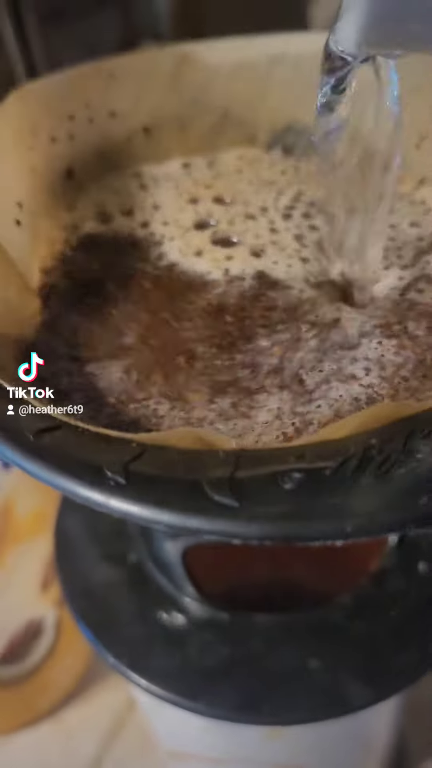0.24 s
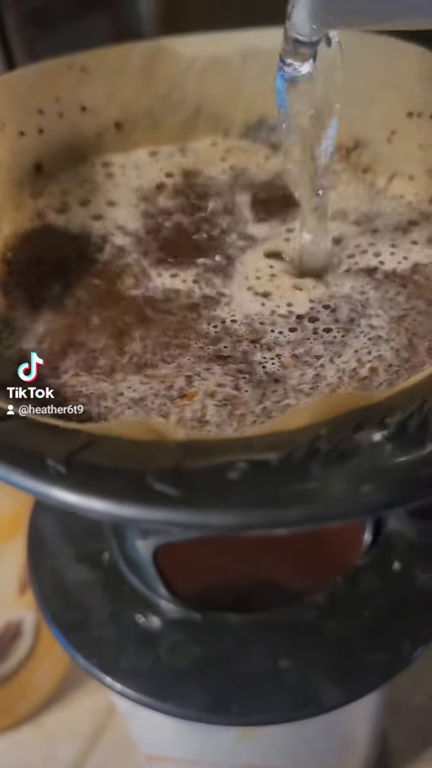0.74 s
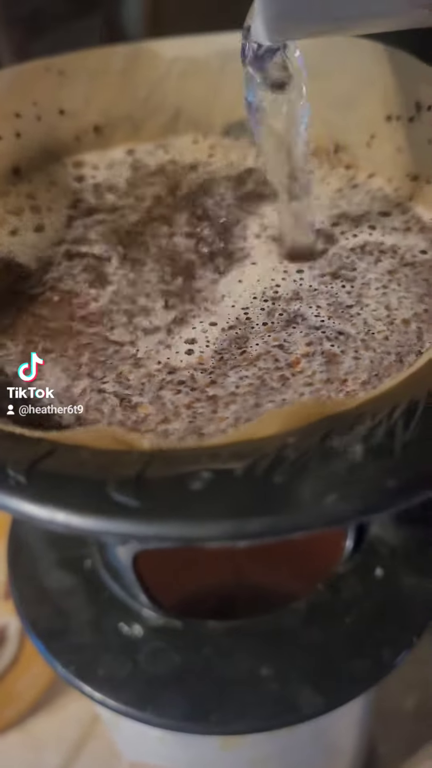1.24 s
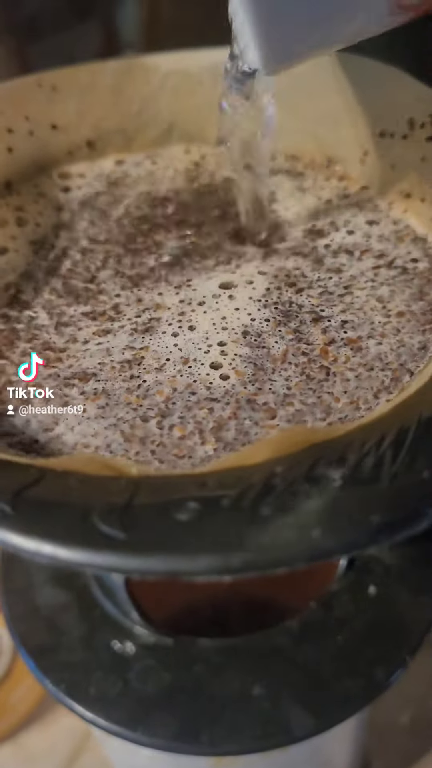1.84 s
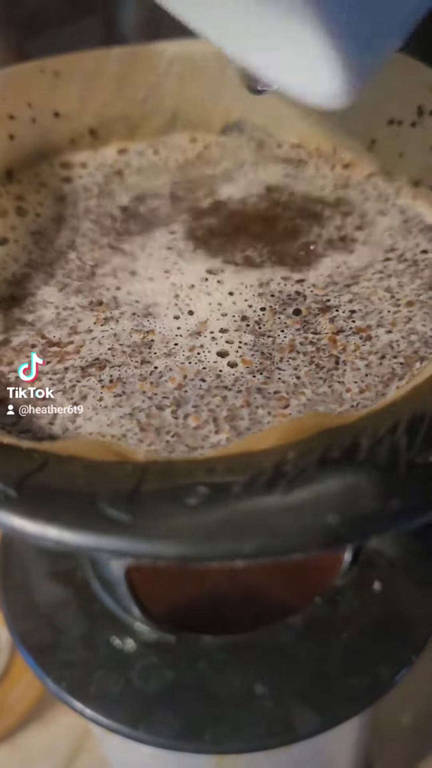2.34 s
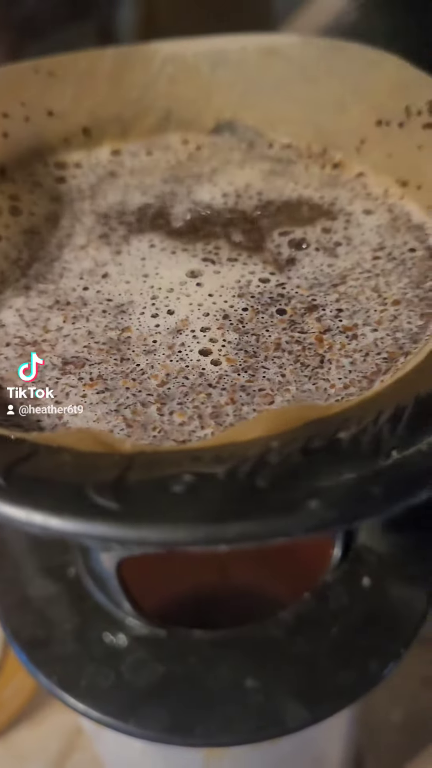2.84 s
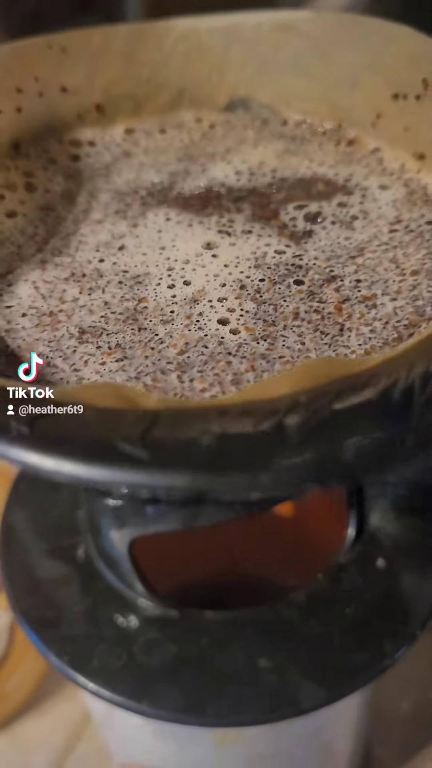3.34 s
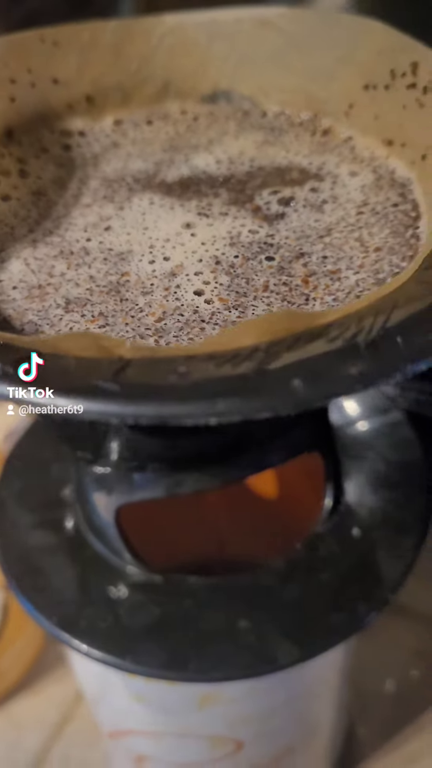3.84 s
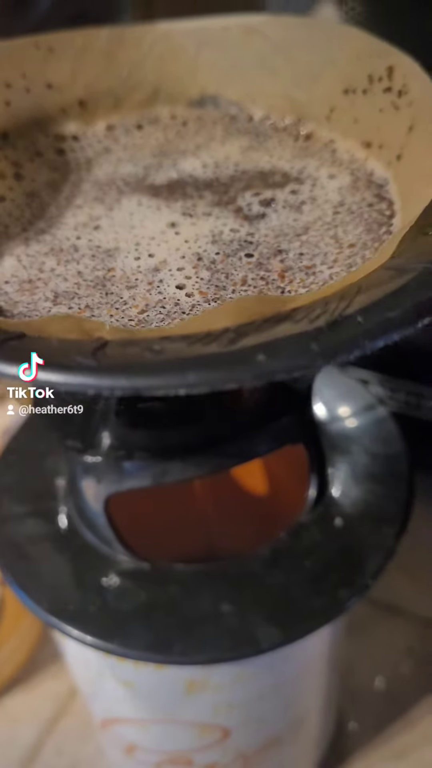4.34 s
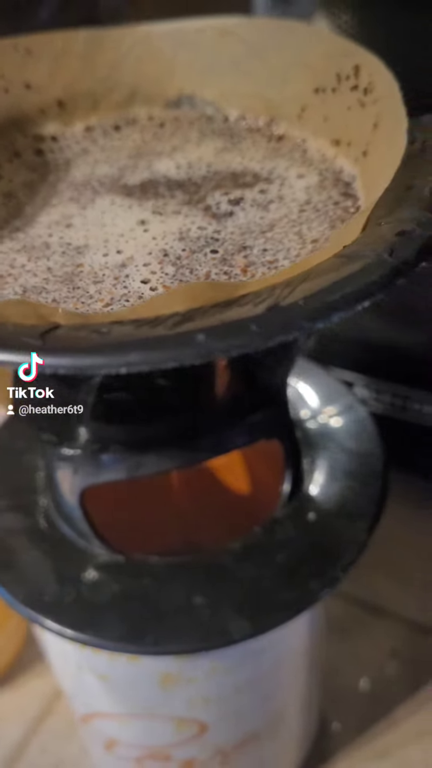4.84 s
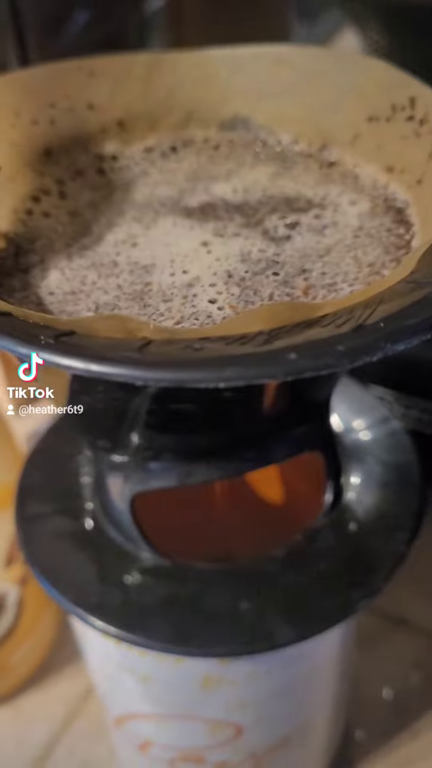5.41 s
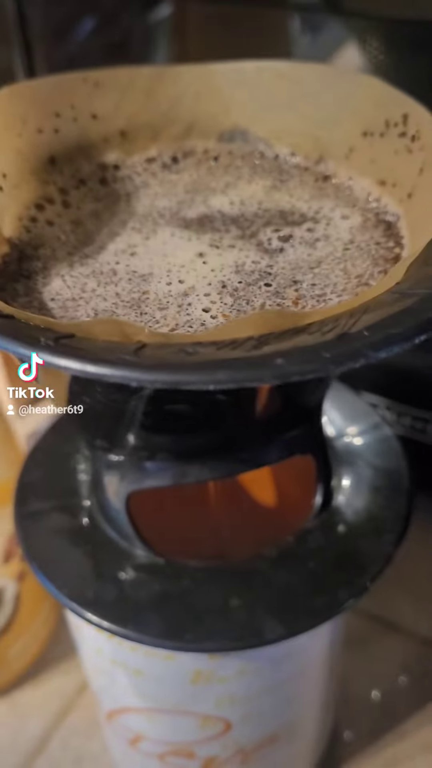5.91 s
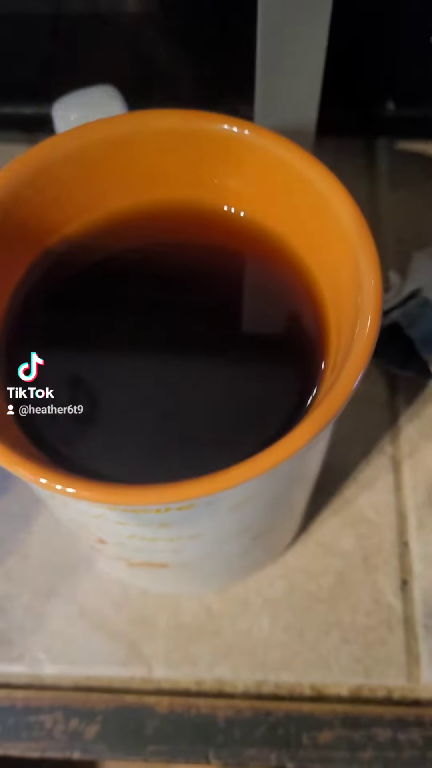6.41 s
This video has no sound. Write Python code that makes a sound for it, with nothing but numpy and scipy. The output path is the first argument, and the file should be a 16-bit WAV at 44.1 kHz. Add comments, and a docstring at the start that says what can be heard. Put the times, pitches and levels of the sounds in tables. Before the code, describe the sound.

Close up in a small quiet kitchen, a thin stream of coffee trickles and drips into a covered ceramic mug with hollow plops and bubbly blips. Water hisses softly onto crackling foam for two seconds, then stops. The dripping thins. Near four seconds a much louder wooden clunk rattles and bumps with a short room tail. After more drips, a tiny silence cuts to humming room tone, a faint swish and a light metallic jingle.

```python
"""Drops splash into a ceramic mug under a plastic filter cone while hot water is poured on the coffee.
Drops tick, slap and trap bubbles that ring the covered mug's air; foam on the grounds fizzes and crackles.
Something wooden, like a cupboard door, clunks and rattles: filtered noise, decaying modes and room tail.
After a short silence a second scene plays: humming room tone, a fading swish and a light metal jingle."""
import sys
import numpy as np
from scipy import signal
from scipy.fft import rfft, irfft
from scipy.io import wavfile
from scipy.ndimage import uniform_filter1d

SR = 44100
rng = np.random.default_rng(int(sys.argv[2]) if len(sys.argv) > 2 else 0)


def output_pcm(signal):
    """Save a mono or channel-first signal as 16-bit PCM at the path in sys.argv[1].

    Samples are clipped to [-1, 1] before scaling.
    """
    pcm = np.clip(np.atleast_2d(signal).T, -1, 1) * 32767
    wavfile.write(sys.argv[1], SR, np.round(pcm).astype(np.int16))


N = 294147
TIME = np.arange(N) / SR
BREW_END_S, SECOND_START_S, BAND_LIMIT_HZ = 6.246, 6.278, 15650

# Event and flow levels are relative: each source adds its own trim.
# background spectra: frequency_hz, density_db
HUSH_SPECTRUM = [(20, -6.5), (70, -8), (160, -11), (300, -14), (660, -13), (1100, -39.5), (2400, -31.5),
                 (4000, -40.5), (15000, -28.5)]
SECOND_HUSH_SPECTRUM = [(20, -10.5), (60, 5.5), (110, -9.5), (260, -4.5), (420, -11.5), (620, -2),
                        (1150, -26), (1900, -11.5), (2450, -34), (3100, -22.5), (3700, -23), (7000, -29),
                        (15000, -36)]
RUMBLE_SPECTRUM = [(20, -31), (42, -19.0), (52, -25.5), (64, 3.0), (90, -32.5), (200, -37.0), (1000, -54.0)]
# steady kitchen hum: frequency_hz, level_db
HUM_TONES = [(64.6, -77), (128, -78), (171.3, -68), (238, -78), (339.5, -77), (635.2, -76), (662, -80)]
# soft swish spectrum: frequency_hz, density_db
SWISH_SPECTRUM = [(300, -33), (600, -2), (1150, -15), (1900, -2.5), (2450, -17), (3150, -3), (3600, -29),
                  (8000, -26)]
SWISH_DB, SWISH_END_S, SWISH_FADE_S = -68, 6.58, 0.2
# kitchen reverberation: frequency_hz, t60_s
ROOM_DECAY = [(100, 0.18), (350, 0.43), (900, 0.2), (2000, 0.24), (5000, 0.23), (14000, 0.41)]
# kitchen colour on the door's room tail: frequency_hz, density_db
KITCHEN_SPECTRUM = [(40, -12), (90, -17.5), (135, -3.5), (190, -15), (290, -3), (550, -6.5), (800, -1),
                    (1400, -6.5), (2200, -4.5), (3200, -17.5), (6000, -22.5), (15000, -55)]

# small metal pieces touching: start_s, level_db
JINGLE_HITS = [(6.327, -50), (6.421, -17.5), (6.48, -38), (6.573, -24.5), (6.6123, -7), (6.619, -33),
               (6.629, -20), (6.654, -25), (6.658, -12.5)]
# modes of the metal pieces: frequency_hz, t60_s, level_db
METAL_MODES = [(5350, .2, -27), (6360, .2, -27), (9150, .11, -17), (10440, .14, -32), (12554, .13, 0),
               (14830, .14, -13), (15010, .15, -7)]
# contact noise of the metal pieces: frequency_hz, density_db
METAL_TICK_SPECTRUM = [(1000, -81), (2500, -66), (3500, -31), (6000, -11), (8500, -7.5), (12500, 3.5),
                       (15500, -2.5)]

# blows of the door: start_s, level_db, treble_corner_hz, room_share_db
DOOR_BLOWS = [(3.8730, 16, 2900, -4), (3.8786, 4, 2580, -8), (3.8850, -1, 2200, -7.5),
              (3.9241, 11.5, 2660, -5), (3.929, 3.5, 2400, 0), (4.026, -12, 2600, -13),
              (4.101, 3.5, 2110, -21), (4.1223, 9.5, 1900, -2.5), (4.1276, -4.5, 1490, 7),
              (4.167, 4.5, 1560, 3.5), (4.199, -0.5, 1290, 0.5), (4.232, -2.5, 790, 4.5),
              (4.271, -14, 600, 2.5), (4.31, -16.5, 1090, 5), (4.34, -14.5, 513, 9), (4.5180, 5, 556, -14),
              (4.5300, 2, 840, -2.5), (4.558, -11, 597, -3)]
# modes of the door panel: frequency_hz, t60_s, level_db
PANEL_MODES = [(130.6, 0.38, -15), (229, 0.4, -13), (276.4, 0.2, -7), (332, 0.15, -4.5), (377, .15, -13),
               (464, 0.33, -9), (527, 0.15, -16), (654, 0.26, -10.5), (738, 0.087, -1.5), (800, 0.16, -4.5),
               (964, 0.41, -14.5), (1070, 0.21, -16.5), (1172, 0.094, -12.5), (1325, .23, -16.5),
               (1540, .25, -23), (1245, 0.044, -2), (1635, 0.048, -6), (1730, 0.11, -5.5), (1770, 0.05, -5),
               (1905, .22, -9), (1857, 0.12, -7), (2190, 0.11, -2), (2340, .1, -10.5), (2622, 0.048, -8.5)]
# thin high metallic ring heard with each blow: frequency_hz, t60_s, level_db
THIN_RING_MODES = [(8000, .2, -9), (12554, .2, 0), (15011, .22, -9)]
# crack of the wood: frequency_hz, density_db
WOOD_SPECTRUM = [(40, -53), (90, -29.5), (190, -11.5), (300, -4), (800, 3), (1350, -6), (1900, -3),
                 (2500, -1), (3200, -12), (5000, -19.5), (8000, -27.5), (15000, -16)]
# door rubbing along: frequency_hz, density_db
RUB_SPECTRUM = [(60, -26.0), (170, -38.0), (330, 11.0), (700, 4.5), (1300, 0.0), (3000, -19.5)]
# strength of the rubbing: time_s, gain
RUB_GAIN = [(4.12, 0.029), (4.22, 0.38), (4.31, 0.19), (4.40, 1), (4.45, 0.037)]

# loudest foam bubbles bursting on the grounds: start_s, level_db
FOAM_POPS = [(0.1702, -41), (0.2017, -44), (0.2755, -41), (0.375, -34.5), (0.406, -40), (0.5521, -56),
             (0.567, -37.5), (0.732, -37), (0.7813, -37), (0.815, -36.5), (1.05, -38), (1.7842, -47),
             (1.8022, -39), (1.8192, -32.5), (1.919, -47), (2.008, -39.5), (2.069, -42), (2.0995, -34.5),
             (2.417, -41.5), (2.4637, -42), (2.5223, -42), (2.538, -44), (2.549, -61), (2.5715, -34.5),
             (2.8955, -41.5), (2.987, -41), (3.495, -35.5), (3.646, -41), (5.045, -39), (5.1076, -40),
             (5.1704, -39), (5.5346, -41), (6.034, -46), (6.072, -44.5)]
# foam heard through the paper cone: frequency_hz, density_db
FOAM_SPECTRUM = [(500, -42.5), (2500, 3.5), (4300, -4), (4900, -4.5), (5600, 1), (6600, -1), (7700, -0.5),
                 (8700, -2), (10500, 1.5), (15000, -3)]
# the fizz calms steadily and follows part of the stream's level
FIZZ_DB, SETTLE_DB_PER_S, FIZZ_FOLLOWS = -68.5, 1.46, 0.75

# hot water running into the foam
POUR_DB, POUR_END_S, POUR_FADE_S = -72.5, 2.21, 0.29
CHURN_DB = -3.5  # relative to the flow level
# strength of the thin stream from the cone: time_s, level_db
STREAM_FLOW = [(0.0, -56.5), (0.6, -51), (0.75, -56.5), (0.83, -46.5), (0.91, -58), (1.2, -55.5),
               (1.8, -57), (2.24, -56.5), (2.38, -61), (2.55, -61.5), (2.97, -53), (3.08, -70.5),
               (3.23, -53.5), (3.4, -65.5), (3.55, -57), (4.6, -54.5), (4.88, -63), (5.08, -57),
               (5.3, -69.5), (5.56, -57.5), (6.06, -55), (6.24, -63)]
# spatter of the stream: frequency_hz, density_db
SPLASH_SPECTRUM = [(60, -33), (170, -20), (260, -5.5), (350, -1), (550, -7.5), (1000, -9.5), (2000, -9),
                   (3500, 10.5), (4800, -7), (9000, -39)]

# air modes of the covered mug: frequency_hz, t60_s, left_db, right_db
MUG_MODES = [(275, 0.031, -10, -10), (410, 0.12, -26, -9.5), (677, 0.028, -17, -3.5),
             (885, 0.039, 3.5, -9.5), (1144, 0.01, -23, -34), (1309, 0.023, -40.5, -4),
             (1690, 0.057, -3.5, -11.5), (2040, 0.048, -8.5, -3.5), (2238, 0.016, -4.5, -4),
             (2286, 0.15, -36, -20), (2745, 0.034, -18, -0.5), (2704, 0.017, -48, -2.5),
             (3490, 0.033, -17, -21), (3380, 0.014, -22.5, -14), (5600, 0.037, -20, -28.5)]
AIR_HZ, FILL_HZ_PER_S = 662.6, 3.4  # the air resonance near 660 Hz rises as the mug fills
# stereo position of the mug's low note: time_s, left_minus_right_db
LOW_NOTE_PAN = [(2.5, 11), (3.1, 7.5), (5.7, 4)]

# large bubbles singing near the mug's 660 Hz air resonance: crest_s, level_db, swell_s (lead is 1.4 times it),
# fade_s
LARGE_BUBBLES = [(0.1053, -31, 0.0041, 0.0034), (0.1212, -39, 0.0014, 0.002), (0.1738, -30, 0.002, 0.002),
                 (0.1827, -29.5, 0.0071, 0.0028), (0.1934, -37.5, 0.0013, 0.0017),
                 (0.2385, -38, 0.0048, 0.0027), (0.2537, -25.5, 0.0051, 0.0044),
                 (0.2666, -45, 0.0025, 0.0015), (0.2798, -40, 0.0015, 0.0015),
                 (0.3551, -29.5, 0.0053, 0.0042), (0.4232, -37, 0.0019, 0.0068),
                 (0.5016, -36.5, 0.0039, 0.0036), (0.5259, -38.0, 0.0017, 0.0015),
                 (0.5463, -40, 0.0016, 0.002), (0.5734, -39, 0.003, 0.0027), (0.5947, -29, 0.0039, 0.0041),
                 (0.6093, -39, 0.0019, 0.0027), (0.6223, -37, 0.0043, 0.0028), (0.689, -50, 0.0019, 0.0019),
                 (0.7348, -39.5, 0.0026, 0.0026), (0.7866, -33, 0.0017, 0.0031),
                 (0.7977, -27.5, 0.0026, 0.0069), (0.818, -29, 0.0013, 0.0076),
                 (0.8266, -28, 0.0023, 0.008), (0.8504, -48, 0.002, 0.0032), (0.8592, -53, 0.0012, 0.002),
                 (1.0105, -46, 0.0012, 0.0017), (1.0559, -33, 0.0043, 0.0052),
                 (1.2186, -29.5, 0.0063, 0.0055), (1.2304, -32, 0.0029, 0.012),
                 (1.2695, -36, 0.0078, 0.0067), (1.3388, -34, 0.0015, 0.0057),
                 (1.4291, -31, 0.0051, 0.0059), (1.5127, -37.0, 0.0014, 0.0017),
                 (1.5261, -44, 0.0022, 0.0022), (1.6626, -33, 0.0045, 0.0033), (1.7657, -28, 0.014, 0.0062),
                 (1.8148, -33.5, 0.0066, 0.0091), (1.832, -27, 0.0036, 0.0051),
                 (1.8538, -33, 0.0062, 0.018), (1.8723, -38, 0.0062, 0.0032),
                 (2.1565, -24.5, 0.0073, 0.0087), (2.1962, -17, 0.0069, 0.0074),
                 (2.5285, -34, 0.0059, 0.0042), (2.5411, -33, 0.0019, 0.0069),
                 (2.5536, -27.5, 0.0049, 0.0065), (2.5764, -51, 0.0028, 0.0021),
                 (2.6177, -34.5, 0.004, 0.0031), (2.8348, -36.5, 0.0019, 0.0021),
                 (2.91, -29.5, 0.0042, 0.0096), (2.9364, -37, 0.0044, 0.006), (2.9865, -34, 0.0015, 0.0023),
                 (2.9953, -37, 0.0052, 0.0019), (3.1442, -34.5, 0.0038, 0.0054),
                 (3.1674, -30.5, 0.0017, 0.0034), (3.2298, -30, 0.0016, 0.0057),
                 (3.3137, -32.5, 0.0018, 0.0041), (3.5304, -32.5, 0.0012, 0.0024),
                 (3.5687, -25.5, 0.007, 0.011), (3.6015, -29.5, 0.011, 0.01), (4.4082, -33, 0.008, 0.005),
                 (4.6911, -32.5, 0.0028, 0.0032), (4.7824, -33, 0.0023, 0.0036),
                 (5.5365, -33, 0.0045, 0.0039), (5.5688, -37, 0.0029, 0.0042), (5.6918, -22, 0.004, 0.015),
                 (5.7552, -30, 0.0026, 0.0051), (5.7853, -33.5, 0.0049, 0.0087),
                 (6.0249, -30, 0.0044, 0.0057), (6.1279, -42, 0.0021, 0.0031)]
# small bubbles trapped by drops: start_s, level_db, pitch_hz, t60_s, rise_share
SMALL_BUBBLES = [(0.0599, -42.5, 2270, 0.0054, 0.48), (0.0999, -46, 1930, 0.007, 0.35),
                 (0.1924, -46, 2035, 0.03, 0.12), (0.2785, -50, 1750, 0.011, 1.1),
                 (0.332, -46.5, 2670, 0.03, 0.075), (0.4133, -36, 2690, 0.019, 1.3),
                 (0.4998, -42, 2050, 0.02, 0.37), (0.5199, -39.0, 2900, 0.0077, 1.1),
                 (0.5678, -46, 3500, 0.014, 0.44), (0.5888, -41, 2110, 0.016, 0.061),
                 (0.6833, -33.5, 3300, 0.01, 1.4), (0.7315, -37, 2030, 0.03, 0.62),
                 (0.7813, -49, 1970, 0.015, 0.73), (0.8145, -48, 2050, 0.032, 0),
                 (0.867, -38, 2070, 0.019, 0.11), (0.9562, -40, 2070, 0.03, 0.48),
                 (0.9858, -45, 2050, 0.016, 0.6), (1.0054, -49, 2050, 0.027, 0.069),
                 (1.116, -37.5, 2920, 0.013, 1), (1.2503, -44, 2120, 0.02, 0.09),
                 (1.2689, -44, 2730, 0.02, 0.05), (1.3376, -35, 2010, 0.011, 0.37),
                 (1.4233, -39, 2140, 0.027, 0.061), (1.6231, -45, 3700, 0.0098, 0.54),
                 (1.6381, -44.5, 2100, 0.01, 0.028), (1.855, -44.5, 2670, 0.022, 1.1),
                 (1.8867, -45.0, 1940, 0.007, 0.32), (1.9424, -41, 2050, 0.022, 0.57),
                 (1.9615, -48, 2120, 0.014, 0.1), (2.013, -43.0, 3680, 0.012, 0.25),
                 (2.1859, -50, 2110, 0.023, 0.2), (2.2384, -46, 2030, 0.011, 0.41),
                 (2.266, -40, 2120, 0.033, 0.037), (2.4323, -41, 3930, 0.0031, 0.37),
                 (2.455, -37, 2540, 0.038, 0.34), (2.5712, -44.5, 2642, 0.064, 0.075),
                 (2.6036, -45.5, 2090, 0.025, 0.29), (2.6737, -37, 1830, 0.019, 0.45),
                 (2.8104, -41, 2630, 0.036, 0.1), (2.8528, -44, 2130, 0.028, 0.43),
                 (2.8671, -51, 2200, 0.017, 0.44), (2.934, -45, 2150, 0.014, 0.026),
                 (2.985, -47, 1510, 0.007, 0.25), (3.198, -38.5, 2060, 0.049, 0.34),
                 (3.3806, -44.5, 2320, 0.015, 1.1), (3.4391, -45.5, 2210, 0.029, 0.41),
                 (3.5465, -41.5, 2580, 0.012, 1.24), (3.5605, -47, 2050, 0.0064, 0.34),
                 (3.6651, -42, 2190, 0.033, 0.19), (4.4813, -43.5, 2740, 0.03, 0.041),
                 (4.4997, -47, 2190, 0.014, 0.51), (4.8913, -44.5, 2180, 0.045, 0.3),
                 (4.9517, -41.5, 2180, 0.048, 0.043), (5.8084, -44, 2780, 0.02, 0.18),
                 (5.8493, -42.5, 2710, 0.028, 0.16), (5.89, -44.5, 2740, 0.049, 0.045),
                 (5.9305, -42.5, 2640, 0.01, 1.36), (6.033, -41.5, 2230, 0.0048, 1.5),
                 (6.2076, -36.5, 2720, 0.019, 0.29), (6.2409, -35.5, 2715, 0.031, 0.25)]
RISE_S = 0.0094  # time constant of the climb to the surface
SCOOP, SCOOP_S = .09, .003  # starts this share of pitch_hz low, with this time constant
SURFACE_HZ = 4100  # ceiling on a bubble's pitch
BUBBLE_ROUGH = .42

# loudest drops slapping the coffee: start_s, level_db
DROP_SPLASHES = [(.0595, -42.5), (.0995, -43), (.1197, -43), (.1695, -38), (.1922, -50), (.2329, -44),
                 (.2476, -37.5), (.2784, -40), (.3489, -42.5), (.4131, -47), (.4996, -38.5), (.5195, -43),
                 (.5887, -46), (.6055, -51), (.635, -54), (.6551, -48), (.6829, -41), (.7281, -41.5),
                 (.7805, -41.5), (.793, -45), (.8143, -40), (.8455, -48), (.8551, -39), (.866, -40),
                 (.9559, -40.5), (1.0051, -37), (1.0278, -44), (1.1157, -42), (1.3374, -50),
                 (1.4232, -36.5), (1.4886, -41.5), (1.5044, -38.5), (1.5205, -39.5), (1.58, -47.5),
                 (1.598, -41), (1.6378, -52), (1.7585, -44), (1.8251, -40), (1.8863, -51.5),
                 (2.0098, -50.5), (2.1854, -42.5), (2.238, -49), (2.2657, -54), (2.2767, -40),
                 (2.4318, -49), (2.5361, -40.5), (2.571, -38), (2.6033, -45), (2.6732, -43),
                 (2.6892, -47.5), (2.7216, -44), (2.8095, -42.5), (2.8281, -47), (2.8525, -46.5),
                 (2.9338, -41.5), (2.9845, -44.5), (3.1977, -47), (3.2272, -47), (3.3108, -48),
                 (3.3801, -53.5), (3.3893, -57), (3.5277, -42.5), (3.5602, -42), (3.6438, -45),
                 (3.6649, -46), (3.7836, -42.5), (4.3567, -46), (4.4194, -49), (4.6411, -47.5), (4.76, -46),
                 (4.781, -45), (4.841, -47), (4.891, -50), (4.9896, -46.5), (5.0629, -46.5),
                 (5.1082, -46.5), (5.1695, -48), (5.365, -49.5), (5.455, -45), (5.53, -42.5),
                 (5.5469, -47.5), (5.5629, -42.5), (5.738, -49), (5.753, -44), (5.9301, -62), (5.9723, -53),
                 (6.0148, -40.5), (6.0326, -48), (6.1212, -42.5), (6.2406, -52.5)]
# smack of a drop: frequency_hz, density_db
SMACK_SPECTRUM = [(100, -35.5), (250, -8), (500, -1.5), (1000, 2.5), (1500, -1), (2200, 5), (3000, 2.5),
                  (4000, -11.5), (8000, -32), (15000, -41)]
# fine spray: frequency_hz, density_db
SPRAY_SPECTRUM = [(1200, -36), (2800, -2.5), (3800, 4.5), (4700, -2.5), (5500, 1.5), (6500, -1.5),
                  (8000, -9), (10000, -14), (15000, -11)]
SMALL_DRIPS_PER_S, SMALL_DRIP_DB = 36, -2  # level relative to the flow
SMALL_BLIP_HZ = 2320


def amp(db):
    """Decibels to gain."""
    return 10 ** (np.asarray(db) / 20)


def evened(x):
    """Scaled to rms 1."""
    return x / np.sqrt(np.mean(x ** 2) + 1e-20)


def unit(x):
    """Scaled to mean energy 1 per channel."""
    return evened(x) / np.sqrt(x.shape[-1])


def peaked(x):
    """Scaled so that the loudest 4 ms of the channel mean have rms 1."""
    return x / np.sqrt(uniform_filter1d(x.mean(0) ** 2, size=176).max())


def read(points, hz):
    """Interpolates (Hz, value) rows on a log-frequency axis."""
    f, value = np.transpose(points)
    return np.interp(np.log(hz + 1), np.log(f + 1), value)


def pan(left_db):
    """Channel gains for a left-minus-right level difference."""
    return amp([[left_db / 2], [-left_db / 2]])


def add(mix, s, sound):
    """Mixes a sound in at time s."""
    part = mix[:, max(round(s * SR), 0):][:, :sound.shape[1]]
    part += sound[:, :part.shape[1]]


def through(x, response):
    """Convolution, cut to the scene's length."""
    return signal.fftconvolve(np.atleast_2d(x), np.atleast_2d(response), axes=1)[:, :N]


def colour(x, spectrum):
    """Minimum-phase filter with the given spectrum."""
    hz = abs(np.fft.fftfreq(2 ** 12, 1 / SR))
    log_gain = np.log(amp(read(spectrum, hz)))
    response = np.fft.ifft(np.exp(np.conj(signal.hilbert(log_gain)))).real
    return through(x, response[:2 ** 11])


def noise(size, alike):
    """Two channels of partly alike noise; long waves reach both microphones the same."""
    a, b = rng.standard_normal((2, size))
    alike = np.clip(alike, -1, 1)
    bass = signal.lfilter(*signal.butter(2, 280, fs=SR), b)[::-1]
    treble = signal.lfilter(*signal.butter(2, 280, "high", fs=SR), b)
    sides = np.array([bass + treble, bass - treble])
    return np.sqrt((1 + alike) / 2) * a + np.sqrt((1 - alike) / 2) * sides


def dying(t, t60):
    """Envelope that falls 60 dB in t60."""
    return np.exp(-np.log(1000) * t / t60)


def burst(t60, alike):
    """A puff of noise with a sudden start."""
    t = TIME[:SR // 5]
    return noise(len(t), alike) * dying(t, t60)


def grainy(size, depth_db):
    """A gain that fluctuates from millisecond to millisecond, rms 1."""
    wander = evened(uniform_filter1d(rng.standard_normal(size), size=60))
    return evened(amp(depth_db * np.clip(wander, -2, 2)))


def mode(hz, t60):
    """One struck resonance of energy 1."""
    t = TIME[:SR // 2]
    return unit(np.sin(2 * np.pi * hz * t) * dying(t, t60))


def patter(per_s, spread_db):
    """Random clicks of either sign with exponentially spread levels, rms 1."""
    size = amp(spread_db * np.minimum(rng.exponential(1, N), 4))
    return evened(size * rng.choice([-1, 1], N) * (rng.random(N) < per_s / SR))


def aside(x, left_db, lag_s):
    """A source off to one side: treble level differs between channels, and one channel lags."""
    hz = np.fft.rfftfreq(2 * N, 1 / SR)
    shade = amp(np.array([[.5], [-.5]]) * left_db * hz ** 2 / (hz ** 2 + 800 ** 2))
    delay = np.exp(1j * np.pi * hz * lag_s * np.array([[1], [-1]]))
    return irfft(rfft(x, 2 * N) * shade * delay)[:, :N]


def flow_db(s):
    """Strength of the stream at time s."""
    return np.interp(s, *np.transpose(STREAM_FLOW))


def pouring(s):
    """Share of the hot water still running at time s."""
    return np.clip((POUR_END_S - s) / POUR_FADE_S, 0, 1)


def room_tone(spectrum, db):
    """Steady coloured noise of the kitchen."""
    return amp(db) * evened(colour(noise(N, alike=0.076), spectrum))


def hum():
    """Steady sines at the hum's partials."""
    return sum(amp(db) * np.sin(2 * np.pi * hz * TIME) for hz, db in HUM_TONES)


def swish():
    """Faint airy noise that soon fades."""
    fade = np.clip((SWISH_END_S - TIME) / SWISH_FADE_S, 0, 1)
    return pan(-9.0) * room_tone(SWISH_SPECTRUM, db=SWISH_DB) * fade


def room():
    """The kitchen's tail: a quick build-up, then each band decays at its own rate."""
    hz, t, z = signal.stft(noise(SR * 3 // 4, alike=0.11), SR, nperseg=256)
    tail = signal.istft(z * dying(t, read(ROOM_DECAY, hz)[:, None]), SR, nperseg=256)[1]
    return unit(tail * (1 - np.exp(-TIME[:tail.shape[1]] / 0.0022)))


def jingle(tick_db=-4):
    """Small metal pieces touch: a noise tick and slightly detuned high modes."""
    out = np.zeros((2, N))
    for s, db in JINGLE_HITS:
        ring = unit(sum(amp(level + rng.uniform(-4, 4, (2, 1))) * mode(hz * rng.normal(1, 0.002), t60)
                        for hz, t60, level in METAL_MODES))
        tick = unit(colour(burst(t60=0.13, alike=0.12), METAL_TICK_SPECTRUM))
        add(out, s, amp(db) * ring)
        add(out, s, amp(db + tick_db) * tick)
    return out * pan(-6.0)


def panel_ring():
    """Panel modes of alternating sign; each blow lands on another spot, so their balance varies."""
    spot_db = rng.uniform(-4, 4, len(PANEL_MODES))
    return unit(sum(amp(level + spot_db[k]) * (-1) ** k * mode(hz, t60)
                    for k, (hz, t60, level) in enumerate(PANEL_MODES)))


def rub(level_db=-42):
    """Low grumble of dense clicks in the room, strongest between the rattle and the last bump."""
    grumble = colour(through(patter(per_s=100, spread_db=11.5), room()), RUB_SPECTRUM)
    return amp(level_db) * evened(grumble) * np.interp(TIME, *np.transpose(RUB_GAIN))


def door(crack_db=-1.5, ring_db=-3.0, room_db=-3, left_db=-7, thin_ring_db=-33):
    """Each blow cracks, rings the panel and fills the kitchen, under its own treble corner; a thin high
    metallic ring sounds with it unfiltered, louder for brighter blows."""
    out = np.zeros((2, N))
    thin_ring = unit(sum(amp(db) * mode(hz, t60) for hz, t60, db in THIN_RING_MODES))
    for s, db, corner_hz, wet_db in DOOR_BLOWS:
        blow = np.zeros((2, SR))
        crack = burst(t60=0.031, alike=0.03) * grainy(SR // 5, depth_db=3.5)
        tail = room()[:, :SR // 2] * grainy(SR // 2, depth_db=3.0)
        add(blow, 0, amp(crack_db) * unit(colour(crack, WOOD_SPECTRUM)))
        add(blow, 0, amp(ring_db) * panel_ring()[None])
        add(blow, .004, amp(room_db + wet_db) * unit(colour(tail, KITCHEN_SPECTRUM)))
        add(out, s, amp(db) * signal.lfilter(*signal.butter(2, min(corner_hz, SR / 3), fs=SR), blow))
        # brighter blows excite the thin ring more
        add(out, s, amp(db + thin_ring_db) * (corner_hz / 3000) * pan(9.9) * thin_ring)
    return aside(out + rub(), left_db, lag_s=-0.0001)


def bubble(hz, t60, rise_per_s):
    """A trapped bubble: soft start, decaying sine whose pitch rises as it nears the surface."""
    t = TIME[:SR // 25]
    tone = np.sin(2 * np.pi * hz * t * (1 + rise_per_s * t / 2))
    return unit(tone * dying(t, t60) * (1 - np.exp(-t * hz)))


def fizz_db(s):
    """Strength of the fizz at time s: steady calming plus part of the flow's swing."""
    return FIZZ_DB - SETTLE_DB_PER_S * s + FIZZ_FOLLOWS * (flow_db(s) - np.mean(STREAM_FLOW, axis=0)[1])


def foam(pop_db=0, wet_db=-11, ring_db=3, ping_db=7):
    """Tiny bubbles burst over the grounds and rustle in the paper cone; bigger ones pop."""
    place = amp(rng.uniform(-7, 7, (2, N)))
    specks = sum(through(place * patter(per_s=41, spread_db=6.5), bubble(hz, 5 / hz, 0))
                 for hz in np.geomspace(4500, 14500, num=9))
    rustle = evened(through(specks, burst(t60=0.068, alike=0.062)))
    fizz = evened(specks) + amp(ring_db) * rustle
    out = amp(fizz_db(TIME)) * evened(colour(fizz, FOAM_SPECTRUM))
    for s, db in FOAM_POPS:
        pop = burst(t60=0.0017, alike=0.13) + amp(wet_db) * burst(t60=0.06, alike=0.11)
        add(pop, 0, amp(ping_db) * bubble(rng.uniform(5500, 12500), .01, 8)[None])
        pop = colour(pop, FOAM_SPECTRUM)
        add(out, s, amp(db + pop_db) * pop / abs(pop.mean(0)).max())
    return out * pan(8.2)


def crackle(over_db, wet_db):
    """Smaller foam bubbles burst at random as short noise puffs, at levels that follow the fizz."""
    out = np.zeros((2, N))
    pops = []
    for _ in range(8):
        puff = burst(t60=0.0012, alike=.4) + amp(wet_db) * burst(t60=0.017, alike=0.18)
        pops.append(unit(colour(puff, FOAM_SPECTRUM)[:, :SR // 10]))
    for k, (s, size) in enumerate(rng.uniform([0, -1], [BREW_END_S, 1], (70, 2))):
        add(out, s, amp(fizz_db(s) + over_db + 8.2 * size) * pops[k % len(pops)])
    return out * pan(3)


def pour(wash_db=-66):
    """Hot water slides into the foam: dense hiss and splashy wash until the pour ends."""
    hiss = sum(through(patter(per_s=570, spread_db=-8.0), burst(t60=0.0032, alike=0.13)) for _ in range(4))
    wash = sum(through(patter(per_s=40, spread_db=7), burst(t60=0.05, alike=0.14)) for _ in range(4))
    surge = amp(flow_db(TIME) - flow_db(0.63))
    hiss = amp(POUR_DB) * evened(colour(hiss, FOAM_SPECTRUM))
    wash = amp(wash_db) * surge * evened(colour(wash, SPRAY_SPECTRUM))
    return (hiss + wash) * pouring(TIME)


def mug():
    """Stereo response of the air between coffee and cone: decaying modes of alternating sign."""
    return unit(sum((-1) ** k * amp([[left], [right]]) * mode(hz, t60)
                    for k, (hz, t60, left, right) in enumerate(MUG_MODES)))


def facing(s):
    """Channel gains of the mug's low note at time s."""
    return amp(np.array([[.5], [-.5]]) * np.interp(s, *np.transpose(LOW_NOTE_PAN)))


def slap(cavity, direct_db=-1):
    """A drop's smack on the surface, heard directly and ringing the mug."""
    smack = unit(colour(burst(t60=0.014, alike=0.75), SMACK_SPECTRUM)[:, :SR // 5])
    return unit(unit(through(smack, cavity)[:, :SR // 5]) + amp(direct_db) * smack)


def small_drops(per_s, over_db, spread_db):
    """Rows of start_s, level_db: drops at random intervals, as strong as the stream flows."""
    chance = rng.random((400, 2))
    s = np.cumsum(-np.log(1 - chance[:, 0])) / per_s
    db = flow_db(s) + over_db + spread_db * (2 * chance[:, 1] - 1)
    return np.column_stack([s, db])[s < BREW_END_S]


def churn(cavity):
    """The stream breaks up while water is poured: a dense, rough spatter of slaps in the mug."""
    spatter = sum(through(patter(per_s=70, spread_db=5.5), slap(cavity)) for _ in range(5))
    return amp(flow_db(TIME) + CHURN_DB) * evened(spatter) * pouring(TIME)


def trickle(cavity, ring_db=-9, direct_db=-19, splash_db=-17, gurgle_db=-2.5, spatter_db=-5):
    """The thin stream spatters and traps bubbles of many sizes; its gurgle keeps the mug's air sounding."""
    small = evened(sum(through(patter(per_s=20, spread_db=7), bubble(hz, 18 / hz, rng.uniform(4, 20)))
                       for hz in np.geomspace(900, 4800, num=24)))
    large = evened(sum(through(patter(per_s=33, spread_db=5.5), bubble(hz, 0.0049, rng.uniform(1.4, 7)))
                       for hz in np.geomspace(560, 1100, num=8)))
    splashes = sum(through(patter(per_s=50, spread_db=7.5), burst(t60=0.012, alike=0.81)) for _ in range(6))
    splashes = evened(colour(splashes, SPLASH_SPECTRUM))
    parts = [(small, ring_db), (large, gurgle_db), (splashes, spatter_db)]
    rung = sum(amp(db) * evened(through(x, cavity)) for x, db in parts)
    # the 660 Hz air resonance rings on from drop to drop
    drone = amp(-2.0) * facing(TIME) * evened(through(splashes.mean(0), mode(663.3, t60=0.11)))
    direct = amp(direct_db) * small + amp(splash_db) * splashes
    return amp(flow_db(TIME)) * (rung + drone + direct)


def plops(ring_db=-21, ring_t60=0.093, level_db=-2.5, pitch_spread=.025):
    """A large bubble swells into the mug's 660 Hz resonance, breaks off and leaves a faint ring."""
    out = np.zeros((2, N))
    chance = rng.uniform(-0.95, 1, (len(LARGE_BUBBLES), 2))
    for (s, db, swell, fade), (detune, phase) in zip(LARGE_BUBBLES, chance):
        hz = (AIR_HZ + FILL_HZ_PER_S * s) * (1 + pitch_spread * detune)
        lead = 1.4 * max(swell, .001)
        t = TIME[:SR // 6] - lead  # zero at the crest
        after = np.maximum(t, 0)
        fall = np.exp(-(after / fade) ** 2) + amp(ring_db) * dying(after, ring_t60)
        shape = np.cos(np.pi / 2 * np.minimum(t, 0) / lead) * fall / (1 + amp(ring_db))
        tone = np.sin(2 * np.pi * (hz * t + phase))
        add(out, s - lead, amp(db + level_db) * facing(s) * shape * tone)
    return signal.lfilter(*signal.butter(3, 470, "high", fs=SR), out)


def blips(cavity, level_db=0, direct_db=6, small_db=0.0, pitch_spread=.28):
    """Trapped bubbles scoop up in pitch and ring the mug; fainter ones come at random."""
    out = np.zeros((2, N))
    chance = rng.uniform([-1, .007, .05], [1, .019, .55], (400, 3))
    small = [(s, db, SMALL_BLIP_HZ * np.exp(pitch_spread * size), t60, rise)
             for (s, db), (size, t60, rise) in zip(small_drops(32, small_db, spread_db=6.5), chance)]
    t = TIME[:SR // 20]
    for s, db, hz, t60, rise in list(SMALL_BUBBLES) + small:
        glide = 1 + rise * (1 - np.exp(-t / RISE_S)) - SCOOP * np.exp(-t / SCOOP_S)
        turns = np.cumsum(np.minimum(hz * glide, SURFACE_HZ)) / SR
        # the churning surface shakes the bubble
        shake = 1 + BUBBLE_ROUGH * evened(uniform_filter1d(rng.standard_normal(len(t)), size=72))
        ping = unit(np.sin(2 * np.pi * turns) * dying(t, t60) * (1 - np.exp(-t * hz)) * shake)
        rung = unit(through(ping, cavity[:, :SR // 6]))
        add(rung, 0, amp(direct_db) * pan(-10.5) * ping)
        add(out, s, amp(db + level_db) * peaked(rung))
    return out


def drips(cavity, splash_db=-1, tick_db=-19, spray_db=-13, late_spray_db=-21, note_db=-1, note_t60=0.054):
    """Each drop ticks, slaps, rings the mug's low note and throws spray, more of it during the pour."""
    out = np.zeros((2, N))
    slaps = []
    for _ in range(16):
        tick = unit(colour(burst(t60=0.0033, alike=0.97), FOAM_SPECTRUM)[:, :SR // 5])
        slaps.append(peaked(slap(cavity) + amp(tick_db) * tick))
    sprays = [peaked(colour(burst(t60=0.032, alike=0.62) * grainy(SR // 5, depth_db=0), SPRAY_SPECTRUM))
              for _ in range(7)]
    drops = [*DROP_SPLASHES, *small_drops(SMALL_DRIPS_PER_S, SMALL_DRIP_DB, spread_db=11.5)]
    for k, (s, db) in enumerate(drops):
        add(out, s, amp(db + splash_db) * slaps[k % len(slaps)])
        note = mode(AIR_HZ + FILL_HZ_PER_S * s, note_t60) * (1 - np.exp(-TIME[:SR // 2] / 0.0021))
        add(out, s, amp(db + note_db) * peaked(facing(s) * note))
        spray_now_db = late_spray_db + pouring(s) * (spray_db - late_spray_db)
        add(out, s, amp(db + spray_now_db) * sprays[k % len(sprays)])
    return out


def scene():
    """Brewing with the door, a short silence, then the quiet kitchen with the jingle."""
    cavity = mug()
    in_mug = drips(cavity) + blips(cavity) + plops() + trickle(cavity) + churn(cavity)
    on_grounds = foam() + crackle(over_db=27.0, wet_db=3.0) + pour()
    brew = aside(in_mug, left_db=-6.0, lag_s=.00009) + on_grounds
    reverb = amp(-10.5) * through(brew, room())
    background = room_tone(HUSH_SPECTRUM, db=-72.0) + room_tone(RUMBLE_SPECTRUM, db=-69.5)
    brewing = brew + reverb + door() + background
    quiet = room_tone(SECOND_HUSH_SPECTRUM, db=-66.0) + hum() + swish() + jingle()
    return brewing * (TIME < BREW_END_S) + quiet * (TIME > SECOND_START_S)


def record(dry):
    """Microphone bass cut, smooth rounding of peaks towards 0.93, then the band limit."""
    heard = signal.lfilter(*signal.butter(3, 34, "high", fs=SR), dry)
    heard = heard / (1 + (heard / .93) ** 6) ** (1 / 6)
    low_pass = signal.firwin(301, BAND_LIMIT_HZ, window=("kaiser", 8), fs=SR)
    return signal.oaconvolve(heard, low_pass[None], "same")


dry = scene()
out = record(dry)
output_pcm(out)
```